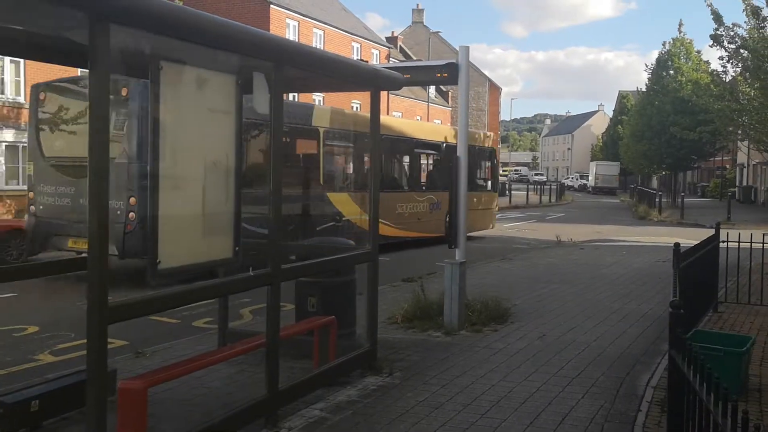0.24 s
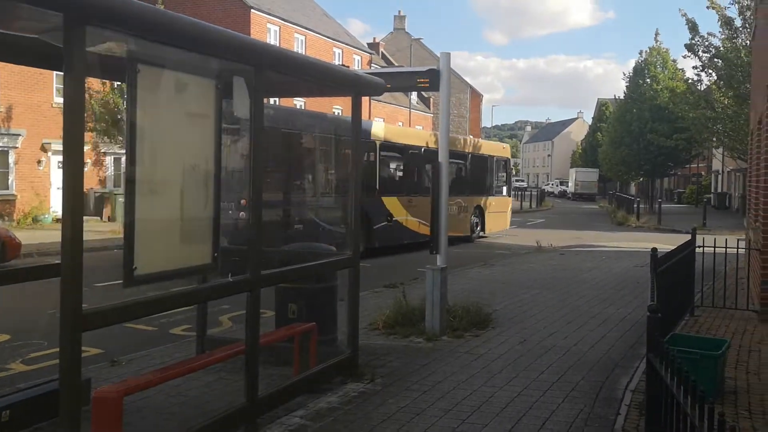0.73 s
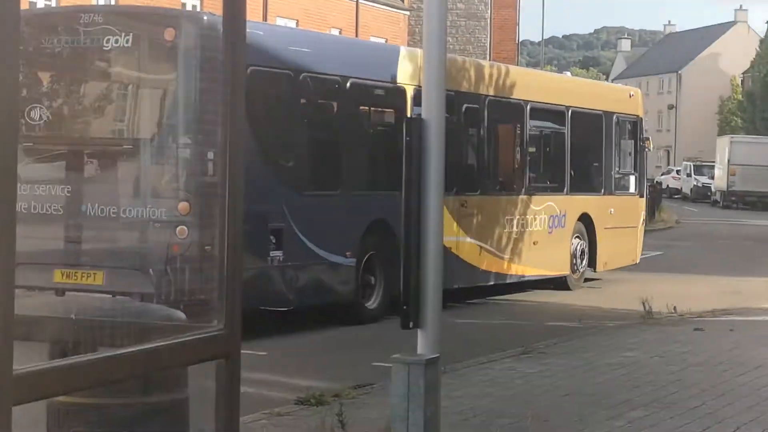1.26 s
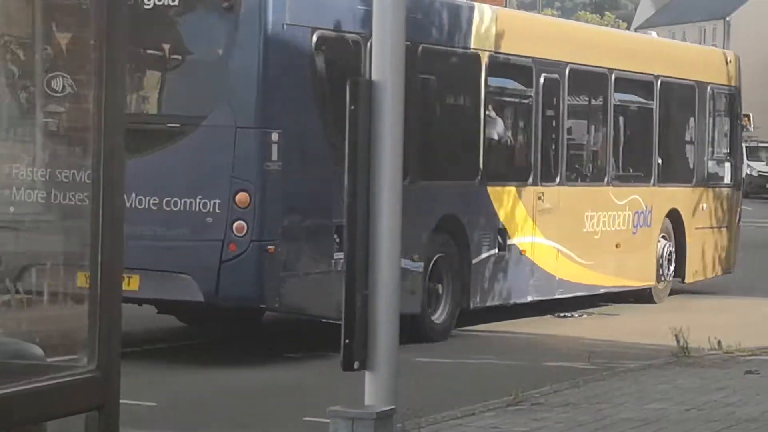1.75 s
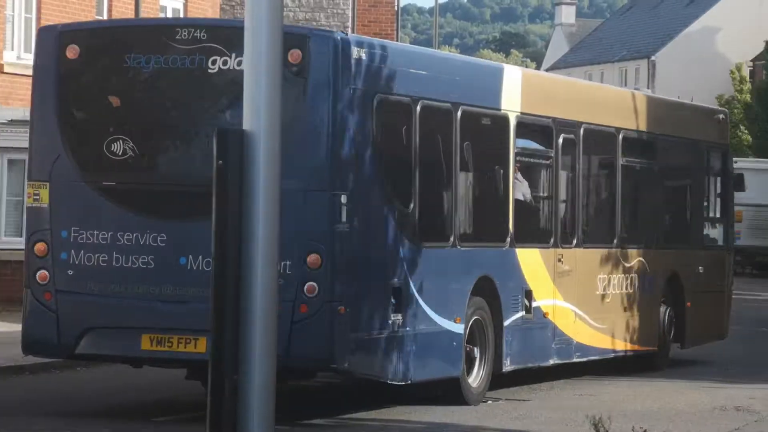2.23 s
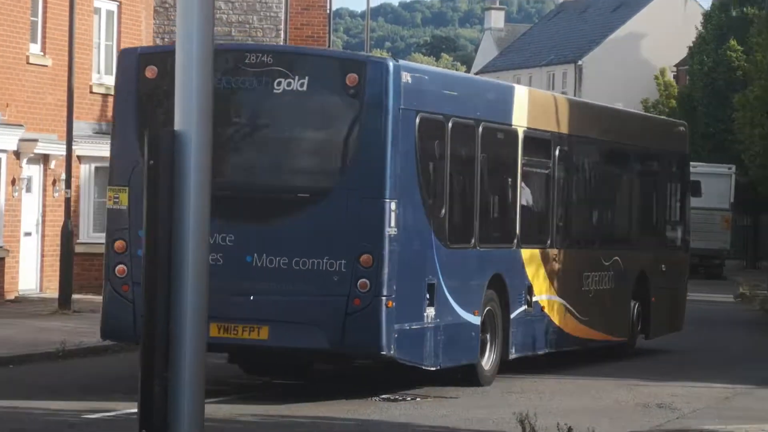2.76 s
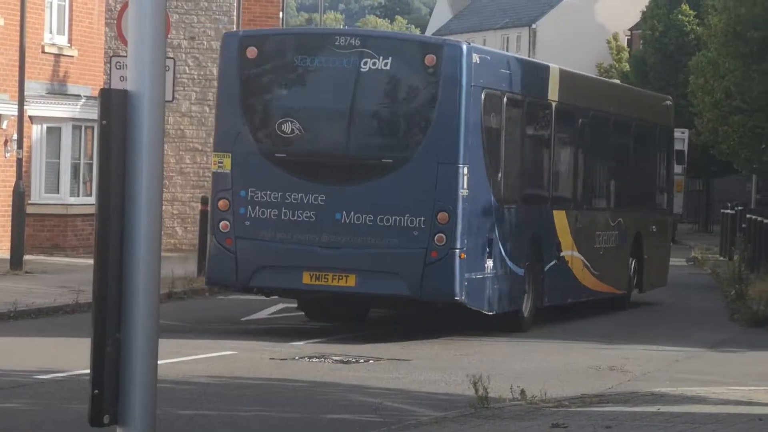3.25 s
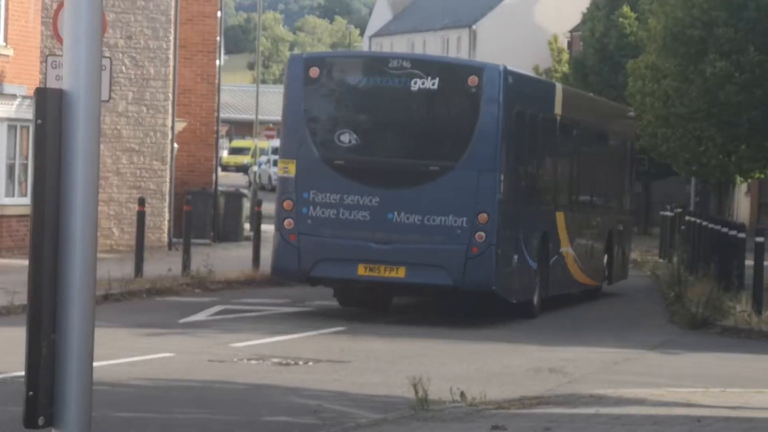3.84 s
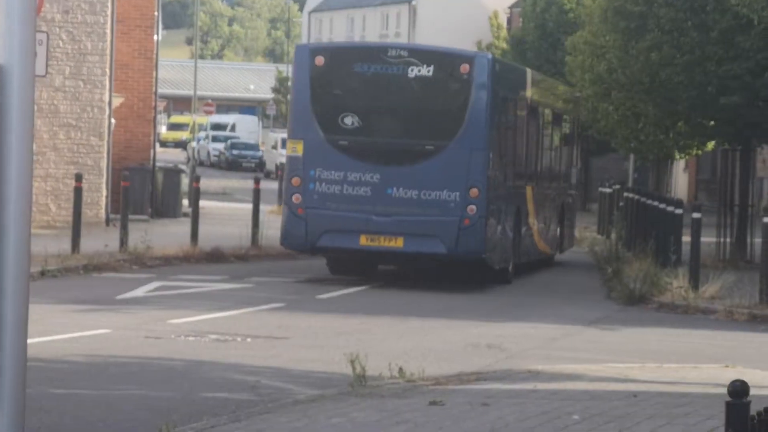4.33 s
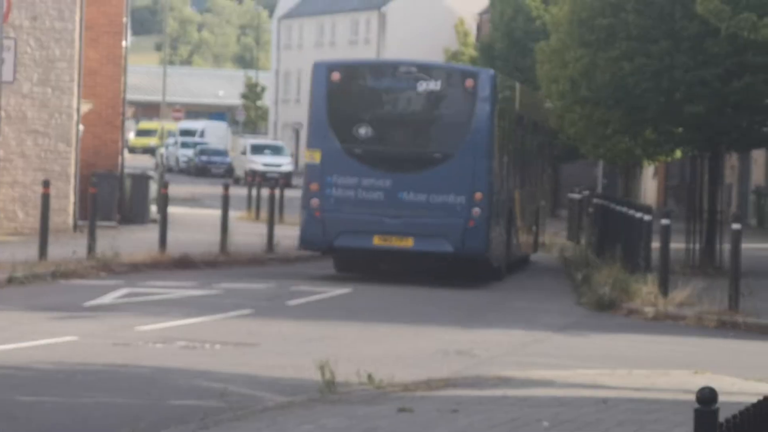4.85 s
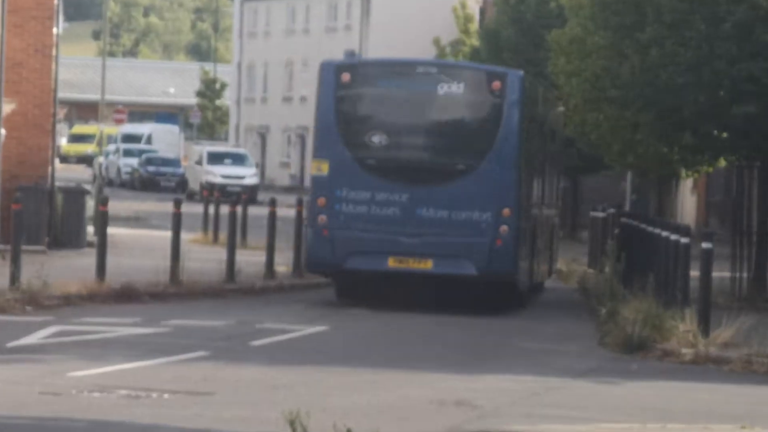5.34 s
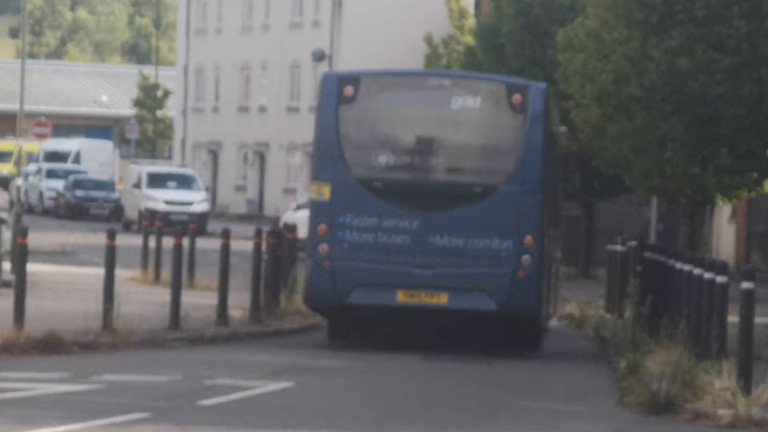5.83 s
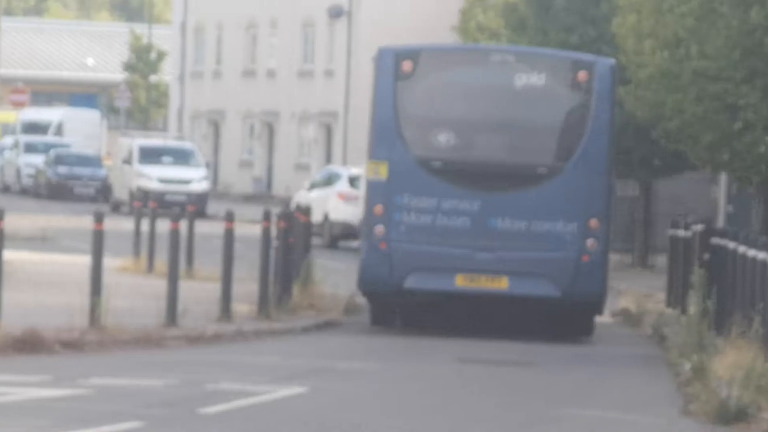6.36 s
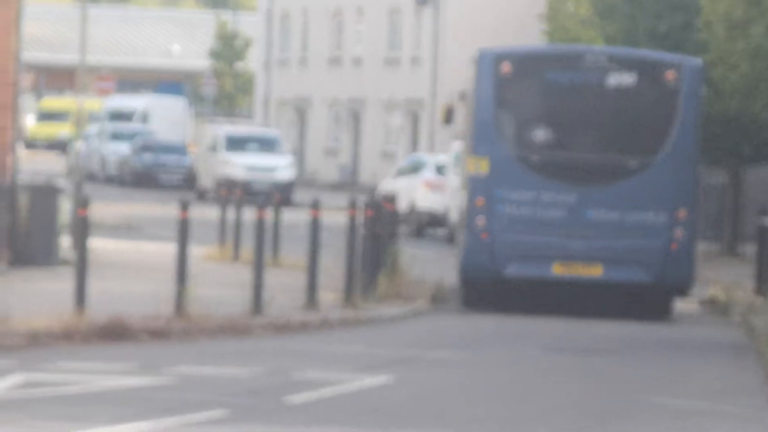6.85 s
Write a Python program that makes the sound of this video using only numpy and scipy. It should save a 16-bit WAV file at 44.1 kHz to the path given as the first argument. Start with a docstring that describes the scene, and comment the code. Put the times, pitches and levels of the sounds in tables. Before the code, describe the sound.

Heavy wind rumble and snapping pops cover rough diesel bus engines and brief air hisses, then ease as one bus drives off with a faint whine.

```python
"""Diesel buses in gusty wind

A roadside stop heard through a hand-held two-port microphone. Wind is shaped noise that rumbles, flutters,
rasps and swells into buffets; eddies snap on the left port as swept thumps with noisy wakes. Bus engines are
noise pulsed at the firing rate under thin gliding whines, as one bus pulls away and another idles; air hisses
on the right until that port shuts part way. Each channel carries a late, dull copy of the other port."""
import sys
import numpy as np
from scipy import signal
from scipy.fft import rfft, irfft, next_fast_len
from scipy.io import wavfile
from scipy.ndimage import uniform_filter1d, minimum_filter1d, map_coordinates

SR = 44100
rng = np.random.default_rng(int(sys.argv[2]) if len(sys.argv) > 2 else 0)


def dump(signal):
    """Clip the signal to [-1, 1] and save it as 16-bit WAV at the path in sys.argv[1]."""
    limited = np.clip(np.atleast_2d(signal).T, -1, 1)
    pcm = np.round(limited * 32767).astype(np.int16)
    wavfile.write(sys.argv[1], SR, pcm)


N = 312669

# steady wind before lean and lumps: t/s, rumble level/dB, flutter level/dB
STEADY_WIND = [(0, -28.5, -23.5), (.45, -24, -27), (.7, -32, -28), (1.1, -26, -37.5), (1.45, -21.5, -26.5),
               (2.1, -24, -32), (2.9, -22.5, -34.5), (3.3, -28, -37), (3.95, -31.5, -41.5),
               (4.35, -23, -43), (4.7, -27, -41.5), (5.45, -33, -40), (5.75, -24.5, -44.5),
               (6.05, -28.5, -40.5), (6.3, -27, -51), (6.7, -23.5, -43), (7.09, -34, -40)]
# buffets rising out of the wind: t at full level/s, hold/s, rumble level/dB, flutter level/dB, rasp level/dB
WIND_BUFFETS = [(0.051, 0.022, -15, -20, -25), (0.141, 0.013, -30, -16, -19.5),
                (0.197, 0.042, -28, -14, -19), (0.271, 0.039, -16, -19, -20.5),
                (0.366, 0.024, -11.5, -12.5, -28), (0.468, 0.14, -25, -29.5, -38),
                (0.659, .03, -15, -20, -27.5), (0.742, 0.046, -16.5, -15, -27.5),
                (0.818, 0.074, -12, -19, -27), (0.918, 0.076, -12.5, -22.5, -36),
                (1.026, 0.027, -15, -30, -34.5), (1.18, 0.065, -17, -19.5, -31),
                (1.251, 0.12, -17, -20, -27.5), (1.491, 0.062, -12, -21, -35.5),
                (1.582, 0.18, -24, -24, -36), (1.794, 0.17, -22, -23.5, -34),
                (2.059, 0.014, -35, -22.5, -46), (2.209, 0.025, -25.5, -28, -40),
                (2.266, 0.011, -21, -17.5, -24.5), (2.305, .015, -35, -20.5, -36),
                (2.37, 0.024, -25, -25, -40), (2.431, 0.061, -16, -16.5, -37),
                (2.554, 0.071, -16, -23, -32.5), (2.667, 0.028, -14.5, -19, -55),
                (2.755, 0.0225, -15.5, -25, -53), (2.818, 0.055, -15, -27.5, -55),
                (3.09, 0.037, -20, -39, -51), (3.289, .05, -21, -38, -54), (4.094, 0.037, -30, -32.5, -53),
                (4.29, .13, -19, -42.5, -61), (4.6, 0.038, -21.5, -39.5, -58),
                (5.802, 0.027, -31, -32, -52.5), (6.095, 0.14, -17.5, -36.5, -50),
                (6.351, 0.023, -17, -32, -48), (6.426, 0.018, -15.5, -40, -61), (6.498, .08, -27, -28, -59),
                (6.84, 0.076, -21.5, -48, -68)]
# wind spectra, overall level set elsewhere: f/Hz, level per Hz/dB
RUMBLE_SPECTRUM = [(10, -35.5), (20, 6), (48, 0), (95, -4), (150, -15.5), (260, -37.5), (500, -91.5)]
FLUTTER_SPECTRUM = [(50, 0), (105, 0), (190, -5.5), (290, -14), (450, -30.5), (700, -30.5), (1200, -82),
                    (2500, -120)]
RASP_SPECTRUM = [(200, -13), (350, 0), (550, -11), (800, -20), (1200, -29), (2000, -94.5)]
# eddies that snap on the left port: t/s, wake peak level/dB, thump and crack level over the wake/dB
EDDY_POPS = [(0.076, -18.5, -4, -28), (0.104, -22, 7, -23), (0.149, -13, 6.5, -17), (0.277, -17.5, 7, -24),
             (0.349, -30.5, 17.5, -29), (0.388, -10.5, 1, -24), (0.563, -26, 10.5, -14),
             (0.657, -12, -1.5, -22), (0.746, -21, 4.5, -15), (0.758, -19, -3, -4), (0.775, -24, 11, -17),
             (0.783, -9.5, -6, -16), (0.806, -12.5, 6, -8), (0.831, -9.5, 7, -14), (0.859, -10, -3, -7),
             (0.874, -40, 2, -15), (1.178, -25, 8, -24), (1.254, -9.5, 3, -32), (1.311, -11.5, 0.5, -12.5),
             (1.341, -24, 17.5, -24), (1.378, -22, 10, -25), (1.566, -19, 3, -30), (1.63, -20.5, 13, -29),
             (1.774, -30.5, 17.5, -25), (1.944, -25, 11, -21), (2.086, -21.5, 8, -29),
             (2.267, -24, 14.5, -23), (2.307, -32, 23.5, -15), (2.368, -22.5, 15.5, -31),
             (2.611, -44, 21.5, 0), (5.818, -46, 17, -13), (6.09, -46, 22, -9), (6.344, -21.5, 10, -18),
             (6.493, -45.5, 22, -12)]
# engines at the left port, before sway and panel lift: t/s, roar level/dB, clatter level/dB
LEFT_ENGINES = [(0, -38, -43), (.35, -38, -46), (.45, -41, -49), (.72, -39.5, -49), (.85, -43, -53),
                (1.15, -40.5, -51), (1.38, -42, -51.5), (1.55, -39.5, -49.5), (2, -37, -46),
                (2.3, -39.5, -46), (2.85, -38.5, -46), (3.02, -35.5, -44), (3.6, -35.5, -44.5),
                (3.95, -35.5, -45), (4.28, -37, -48), (4.4, -40, -50), (4.8, -39, -48.5), (5.7, -38.5, -50),
                (6.05, -37, -50), (6.25, -41.5, -53), (7.09, -40, -51.5)]
# air hiss at the open right port, before sway, dulling and panel lift: t/s, level/dB
RIGHT_AIR = [(0, -41), (.45, -49.5), (.75, -47), (.9, -52.5), (1, -68), (1.27, -65), (1.45, -52),
             (1.8, -42.5), (2.1, -41), (2.35, -45.5), (2.55, -46), (2.8, -49), (2.94, -52)]
# engine and air spectra before panel lift, overall level set elsewhere: f/Hz, level per Hz/dB
ROAR_LEFT_SPECTRUM = [(400, -6.5), (560, 0.5), (730, 1.5), (870, -4.5), (1100, -0.5), (1250, -7),
                      (1400, -6.5), (1750, -4.1), (2050, -2.5), (2700, -4), (3000, -7.5), (3300, -8.5)]
CLATTER_SPECTRUM = [(3000, -17), (3600, -2), (4200, -4), (4600, -1.5), (5100, -4.5), (5700, -4), (6200, -9),
                    (6900, -9), (7600, -6.5), (8500, -13.5), (10000, -29), (12000, -33.5), (14500, -47)]
ROAR_RIGHT_SPECTRUM = [(800, 3), (1000, -3.5), (1200, -1.1), (1500, -7.5), (1780, -1), (2150, -2),
                       (2550, -1.5), (2950, -14), (3300, -13)]
HISS_SPECTRUM = [(3000, -5.5), (3750, -2), (4300, -6), (4800, -5.5), (5200, -6), (5700, -5.5), (6300, -10),
                 (7300, -13), (7800, -29), (8200, -39)]
# a small part that rings at each firing: f/Hz, level per Hz/dB
TICK_SPECTRUM = [(4100, -30), (4450, -10.5), (4600, 3.5), (4750, -7.5), (5100, -29)]
# how clearly single firings show: t/s, mean firing f/Hz, share in the roar/0-1, share in the clatter/0-1
FIRING_PULSE = [(0, 40, .15, .1), (2, 55, .1, .05), (4.2, 70, .1, .08), (4.4, 41, .1, .12),
                (5.1, 41, .12, .25), (5.5, 41, .1, .16), (6.3, 41, .1, .2), (7.09, 41, .1, .1)]
# gear and fan whines, one list per tone, before drift: t/s, f/Hz, level/dB
WHINE_GLIDES = [
    [(2.55, 1200, -70), (2.75, 1188, -50.5), (2.95, 1205, -55), (3.2, 1190, -73)],
    [(2.6, 647, -63.5), (2.95, 652, -47), (3.3, 683, -47.5), (3.6, 727, -50), (3.95, 767, -48),
     (4.25, 792, -55), (4.4, 800, -98)],
    [(3.7, 1985, -75), (3.85, 1988, -54), (4.2, 1988, -55), (4.4, 1990, -72)],
    [(4.4, 1725, -78), (4.6, 1753, -47.5), (5, 1787, -60), (5.4, 1722, -55), (6, 1734, -60),
     (6.5, 1743, -60), (7, 1700, -72)],
]
# body panels that ring along: f/Hz, width/Hz, lift level/dB
PANEL_RINGS = [(1222, 29, 5.5), (1723, 150, 4), (2455, 240, 2.5), (5890, 110, 0)]

RISE_DB_PER_S, FALL_DB_PER_S = 702.5, 500  # how fast a buffet comes and goes
LEAN_DB, LEAN_SWING_DB = 2.5, 2.5  # flutter leans to the left port, unsteadily
RASP_DB, RASP_RIGHT_DB = -12.5, -9  # steady rasp over flutter; right port's rasp over left
ROAR_RIGHT_DB = -1  # roar at the open right port over the left
SHUT_S, SHUTTING_S = 2.97, 0.036  # middle and length of the right port's closing
TOP_HZ, FADE_S = 15600, 0.006  # band limit; fade at each end


def amp(db):
    """Decibels to gain."""
    return 10 ** (np.asarray(db) / 20)


def unit(x):
    """Scale to rms 1."""
    return x / np.sqrt(np.mean(x ** 2) + 1e-20)


def curves(rows):
    """Draw each column after the time as a curve with one value per sample."""
    s, *columns = np.transpose(rows)
    return [np.interp(np.arange(N) / SR, s, column) for column in columns]


def wobble(rate):
    """A smooth random curve with this many knots a second."""
    knots = rng.standard_normal(int(N * rate / SR) + 4)
    return map_coordinates(knots, [np.arange(N) * rate / SR])


def filtered(x, response):
    """Multiply the spectrum by a response; a ramp joins the two ends so that they do not click."""
    m = next_fast_len(N + SR // 2)
    ramp = np.linspace(x[..., -1], x[..., 0], m - N, axis=-1)
    looped = np.concatenate([x, ramp], axis=-1)
    spectrum = rfft(looped) * response(np.fft.rfftfreq(m, 1 / SR))
    return irfft(spectrum, m)[..., :N]


def coloured(x, points, low_slope_db=-30, high_slope_db=-60):
    """Shape x through spectrum points, with a slope per octave beyond both ends, at rms 1."""
    f, db = np.transpose(points)
    # each end is carried on for two octaves, then held
    f = np.r_[f[0] / 4, f, f[-1] * 4]
    db = np.r_[db[0] + 2 * low_slope_db, db, db[-1] + 2 * high_slope_db]
    return unit(filtered(x, lambda hz: amp(np.interp(np.log(hz + 1), np.log(f + 1), db))))


def dulled(x, edge_hz, top_db):
    """Turn down everything over the edge by a level curve; the curve never boosts."""
    low = filtered(x, lambda hz: 1 / (1 + (hz / edge_hz) ** 4))
    return low + amp(np.minimum(top_db, 0)) * (x - low)


def patchy(depth_db):
    """White noise whose level varies in patches of time and pitch."""
    z = signal.stft(rng.standard_normal(N), nperseg=512)[2]
    field = uniform_filter1d(rng.standard_normal(z.shape), size=6, axis=0)
    field = uniform_filter1d(field, size=12, axis=1)
    return signal.istft(z * amp(depth_db * unit(field)), nperseg=512)[1][:N]


def gusting():
    """Rumble, flutter and rasp levels: buffets rise out of the steady wind, hold and fall back, summed as power."""
    rumble_db, flutter_db = curves(STEADY_WIND)
    t = np.arange(N) / SR
    power = amp([rumble_db, flutter_db, flutter_db + RASP_DB]) ** 2
    for s, hold_s, *levels_db in WIND_BUFFETS:
        rise_db = RISE_DB_PER_S * (t - s)
        fall_db = FALL_DB_PER_S * (s + hold_s - t)
        shape_db = np.minimum(0, np.minimum(rise_db, fall_db))
        power = power + amp(np.c_[levels_db] + shape_db) ** 2
    return 10 * np.log10(power)


def wind():
    """Big eddies rumble on both ports; small ones flutter in lumps, each port its own; fine rasp sits mostly left."""
    rumble_db, flutter_db, rasp_db = gusting()
    lean_db = LEAN_DB + LEAN_SWING_DB * wobble(12)
    noise = rng.standard_normal((6, N))

    surge = amp(1.96 * wobble(12))
    rumble = coloured(noise[:2] * surge, RUMBLE_SPECTRUM) * amp(rumble_db)
    rumble = rumble * amp([[0], [-6]])  # left, right
    rumble = dulled(rumble, edge_hz=67, top_db=0.33 * (flutter_db + 19.5))  # slow wind makes slow eddies

    lumps = amp(3.36 * np.array([wobble(35), wobble(35)]))
    sides_db = np.array([0.5 * lean_db, -1.3 * lean_db])
    flutter = amp(flutter_db + sides_db) * coloured(lumps * noise[2:4], FLUTTER_SPECTRUM)

    grit = amp(6.5 * np.array([wobble(70), wobble(70)]))
    rasp = amp(rasp_db) * amp([[0], [RASP_RIGHT_DB]]) * coloured(grit * noise[4:], RASP_SPECTRUM)
    return rumble + flutter + rasp


def pops():
    """Each pop is a pressure swing that slows as the eddy leaves, with a rough wake and a brighter crack."""
    out, t = np.zeros(N + SR), np.arange(SR // 12) / SR
    dull = signal.butter(4, [230, 662], "band", fs=SR, output="sos")
    bright = signal.butter(4, [650, 1470], "band", fs=SR, output="sos")
    swing_hz = 90 + 330 * np.exp(-t / 0.00836)
    swing = np.sin(2 * np.pi * np.cumsum(swing_hz) / SR)
    swing = swing * amp(-60 * t / 0.082) * (1 - np.exp(-t / 0.0016)) ** 2
    for s, db, thump_db, crack_db in EDDY_POPS:
        thump = rng.choice([-1, 1]) * swing  # push or pull
        noise = rng.standard_normal(len(t)) * amp(-60 * t / 0.074) * (1 - np.exp(-t / 0.0004))
        wake = signal.sosfilt(dull, noise)
        crack = signal.sosfilt(bright, noise * amp(-60 * t / 0.06))
        pop = wake / np.abs(wake).max()
        pop += amp(crack_db) * crack / np.abs(crack).max()
        pop += amp(thump_db) * thump
        out[round(s * SR):][:len(t)] += amp(db) * pop
    return out[:N]


def whines():
    """Thin unsteady sine tones of gears and fan, drifting in pitch and level."""
    out = np.zeros(N)
    for rows in WHINE_GLIDES:
        hz, db = curves(rows)
        level = np.sqrt(2) * amp(db + 2.5 * wobble(14))  # root 2 makes the level an rms one
        drifting_hz = hz + 5 * wobble(30)
        out += level * np.sin(2 * np.pi * np.cumsum(drifting_hz) / SR)
    return out


def fired(rate, share, sharp):
    """Noise of which a share swells at each firing and decays towards the next, each firing its own size."""
    turns = np.cumsum(rate * (1 + 0.015 * wobble(6))) / SR
    size = amp(4.0 * rng.standard_normal(1000))[turns.astype(int)]
    phase = turns % 1
    burst = unit(size * phase * np.exp(-sharp * phase))
    share = np.clip(share, 0, 1)
    return patchy(depth_db=0.04) * (1 - share + share * burst)


def panels(x):
    """Narrow lifts where the bodywork rings along."""
    def lift(hz):
        return amp(sum(db / (1 + (2 * (hz - centre) / width) ** 2) for centre, width, db in PANEL_RINGS))
    return filtered(x, lift)


def buses():
    """Combustion roar rings the panels under valve clatter and ticks; the right port has its own roar and air hiss."""
    rate, roar_share, clatter_share = curves(FIRING_PULSE)
    roar_db, clatter_db = curves(LEFT_ENGINES)
    hiss_db, = curves(RIGHT_AIR)
    sway_db = 0.27 * wobble(8)

    roar = coloured(fired(rate, roar_share, 3), ROAR_LEFT_SPECTRUM, low_slope_db=7.0, high_slope_db=-29)
    clatter = coloured(fired(rate, clatter_share, 5), CLATTER_SPECTRUM, low_slope_db=-67.5)
    tick = coloured(fired(rate, 1, 9), TICK_SPECTRUM)
    left = amp(roar_db + sway_db) * roar + amp(clatter_db + sway_db) * clatter
    left += 1.3 * clatter_share * amp(clatter_db) * tick

    # once the right port is shut, only a trace of the engines seeps in
    shut = np.clip((np.arange(N) / SR - SHUT_S) / SHUTTING_S + 0.5, 0, 1)
    roar_right_db = shut * (roar_db - 26) + (1 - shut) * (roar_db + ROAR_RIGHT_DB)
    hiss_db = shut * (clatter_db - 16.5) + (1 - shut) * hiss_db
    roar = coloured(fired(rate, roar_share, 6), ROAR_RIGHT_SPECTRUM, low_slope_db=-1.5, high_slope_db=-22.0)
    hiss = coloured(patchy(depth_db=1.6), HISS_SPECTRUM, low_slope_db=-60.5, high_slope_db=-89)
    hiss = dulled(hiss, edge_hz=4900, top_db=1.4 * (hiss_db + 48.7))  # a faint hiss loses its top
    right = amp(roar_right_db + sway_db) * roar + amp(hiss_db + sway_db) * hiss
    return panels(np.array([left, right])) + [whines(), np.zeros(N)]


def scene():
    """Pressure at the two ports: wind and buses on both, pops on the left."""
    ports = wind() + buses()
    ports[0] += pops()
    return ports


def limited(x, top_db, hold_s):
    """Gain control: peaks over the top pull both channels down together for a moment."""
    peak = np.abs(x).max(axis=0) + 1e-9
    gain = np.minimum(1, amp(top_db) / peak) ** 0.66  # the power leaves part of the overshoot
    span = max(int(hold_s * SR), 2)
    return x * uniform_filter1d(minimum_filter1d(gain, span), span // 2)


def record(dry):
    """Each channel also hears the other port, late and dull; then gain control, circuit hiss, fades, band limit."""
    def crossing(hz):
        late = np.exp(-2j * np.pi * hz * 0.00051)  # delay in seconds
        return late / (1 + 1j * hz / 390) / (1 + 1j * hz / 7000)
    across = filtered(dry[::-1], crossing)
    circuit_hiss = amp(-76) * rng.standard_normal(dry.shape)
    levelled = limited(dry + across, top_db=-4.5, hold_s=0.045)
    to_end = np.minimum(np.arange(N), np.arange(N)[::-1])
    ends = np.minimum(1, to_end / (FADE_S * SR))
    return filtered(ends * (levelled + circuit_hiss), lambda hz: hz < TOP_HZ)


dry = scene()
out = record(dry)
dump(out)
```